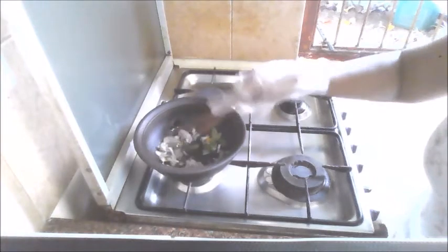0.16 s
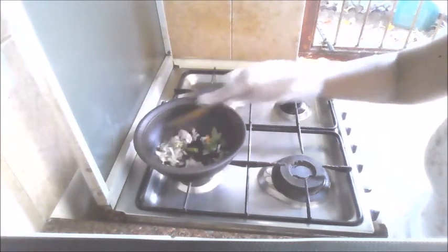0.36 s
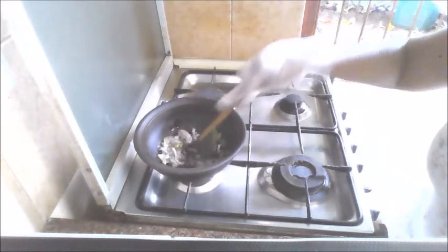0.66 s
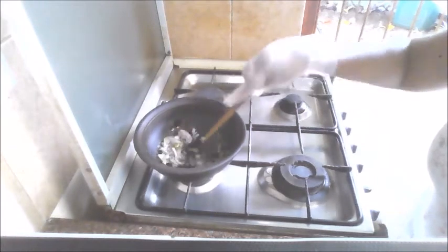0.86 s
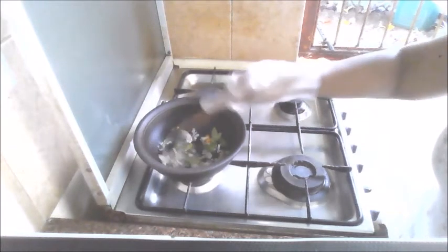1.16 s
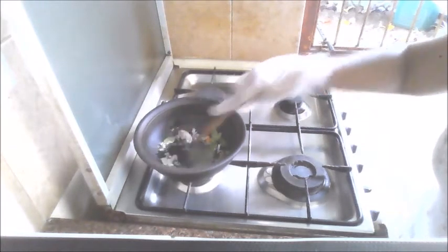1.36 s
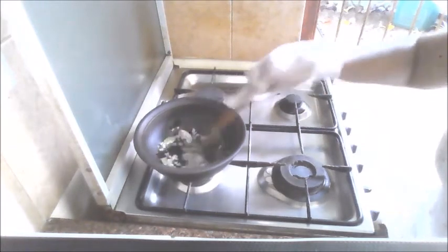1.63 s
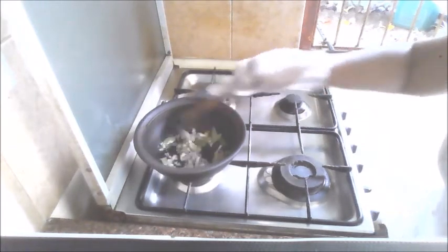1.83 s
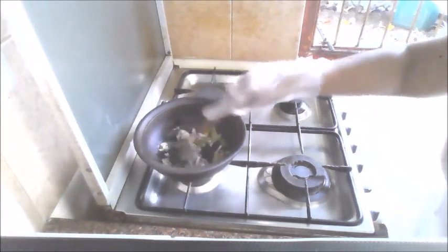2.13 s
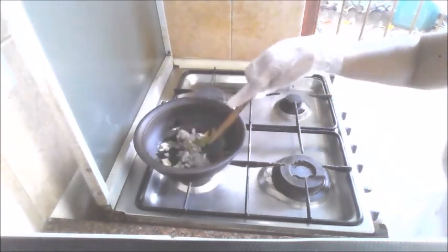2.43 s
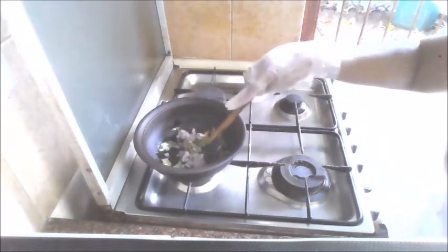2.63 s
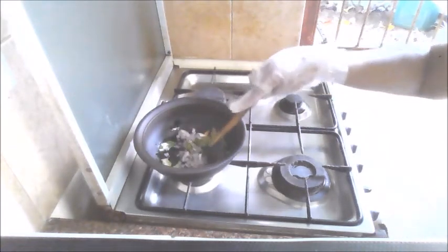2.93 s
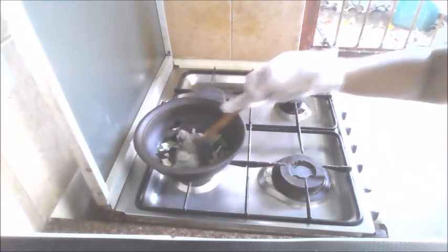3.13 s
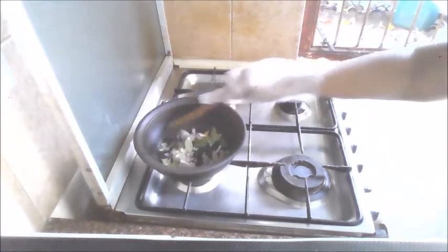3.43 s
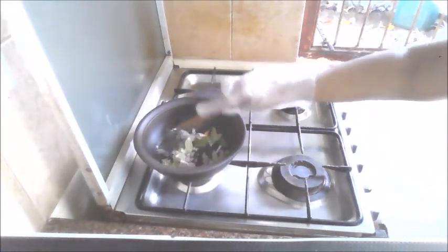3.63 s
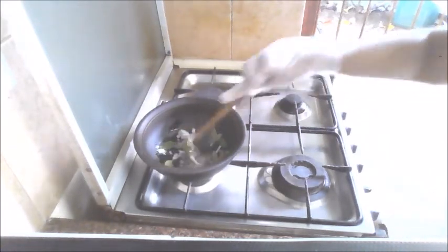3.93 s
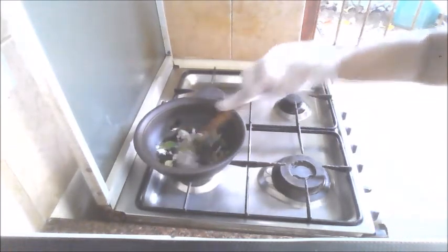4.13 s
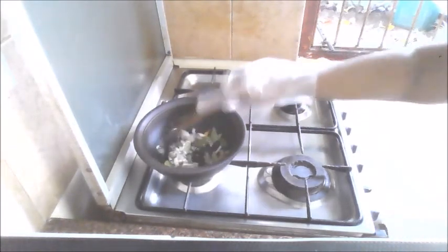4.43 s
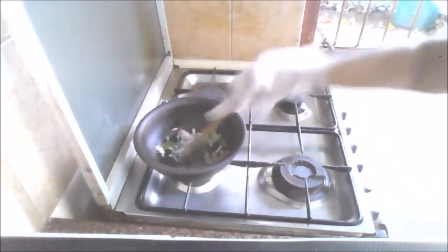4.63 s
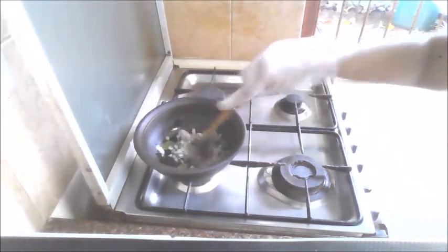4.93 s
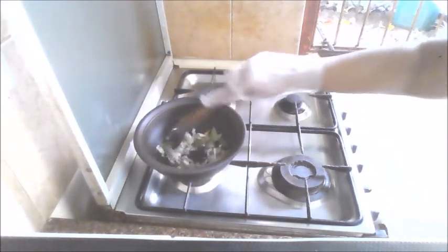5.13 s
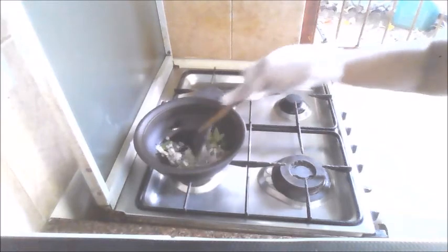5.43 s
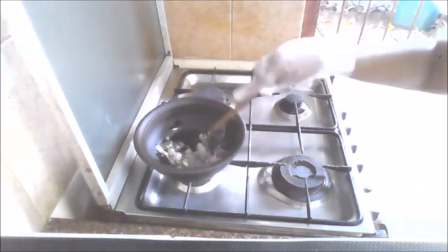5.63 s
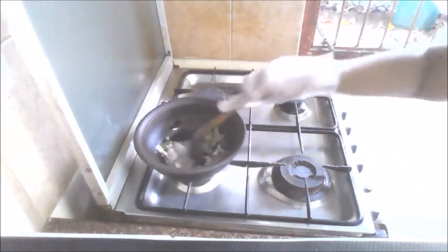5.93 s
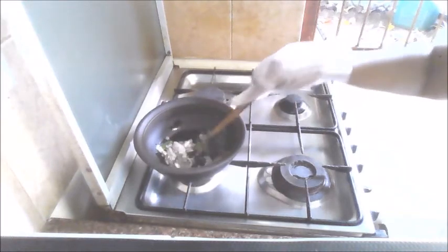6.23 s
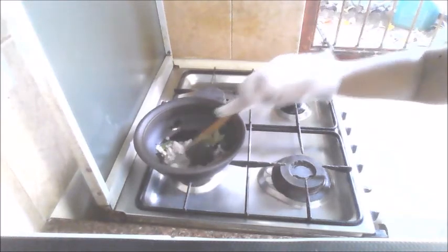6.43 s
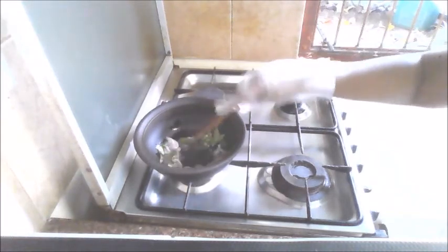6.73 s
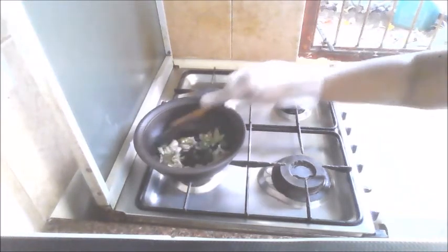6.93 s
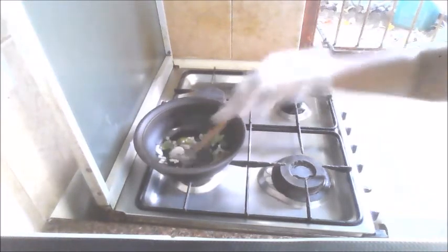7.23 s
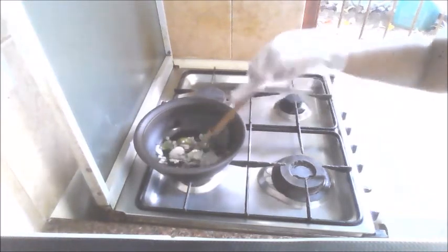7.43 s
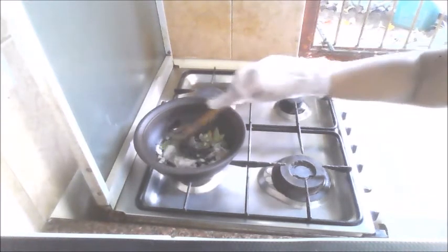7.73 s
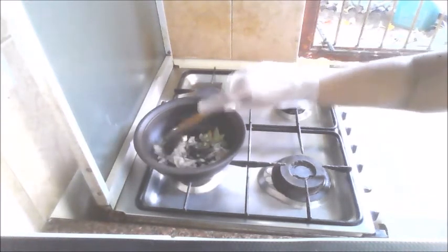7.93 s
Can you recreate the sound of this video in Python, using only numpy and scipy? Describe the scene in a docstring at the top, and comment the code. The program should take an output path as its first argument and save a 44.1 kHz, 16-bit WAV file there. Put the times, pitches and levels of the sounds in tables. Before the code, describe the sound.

A close microphone in a small tiled kitchen catches a wooden spoon stirring chopped vegetables in a clay pot on a stove. Oil fizzes quietly throughout, with fine high crackles and a sharp early spit at 0.1 s. Around 0.7-0.9 s the spoon scrapes and taps while the pot thumps low on its grate. Gentle gliding and rustling follow, with knocks at 2.2 and 2.6 s. A harder clack comes at 3.3 s, a strong double knock with a rasp at 4.3 s, more scraping and bright spits at 4.7-4.9 s, and the loudest knock at 5.4 s, trailed by a short scrape. Stirring then lightens, with small scrapes near 6.9 and 7.3 s and sizzling to the end at about 8 s. Outside, a faint, hoarse bird whistle rises and falls every 0.4 s until about 5.7 s. Still air and faint low hum lie behind.

```python
"""Stirring a clay pot

Close by, a wooden spoon stirs chopped vegetables in a clay pot on a gas stove in a small tiled room.
It knocks, chatters and scrapes: irregular impacts and slips ring the modes of the clay and the spoon.
Shaped noise makes the pot's rumble on its grate, the rustling food and the oil, which fizzes and spits.
Outside the window a bird repeats one arching, wavering whistle; a faint hum and still air lie behind."""
import sys
import numpy as np
from scipy import signal
from scipy.fft import rfft, irfft, next_fast_len
from scipy.io import wavfile
from scipy.ndimage import uniform_filter1d, map_coordinates

SR = 44100
rng = np.random.default_rng(int(sys.argv[2]) if len(sys.argv) > 2 else 0)


def generate_wav(sig):
    """Save sig (samples, or channels by samples) to the path in sys.argv[1] as 16-bit PCM at SR."""
    pcm = np.round(np.clip(np.atleast_2d(sig).T, -1, 1) * 32767).astype(np.int16)
    wavfile.write(sys.argv[1], SR, pcm)


N = 355887

# Spoon on the pot: (time [s], level before trim [dB], thud re middle band [dB], clack re middle band [dB],
# time between rebounds [s], loss per rebound [dB], resonance of that spot [Hz], its lift [dB], dull above [Hz])
KNOCKS = [(.359, -50, -17, 7, 0.0035, 3, 1930, 14.5, 3000), (0.718, -35, -19, 0, 0.019, 31, 1110, 10, 2600),
          (.744, -26, 1, -5, 0.011, 12, 540, 11, 3500), (.826, -29.5, -20, -5, 0.013, 9, 580, -5, 1500),
          (2.168, -28, -12, -4.5, .006, 10, 1060, -11, 3280),
          (2.175, -21.5, 2, -25, .016, 43, 790, 0, 2600),
          (2.583, -30, -10, 5.5, 0.016, 7.5, 1880, 7.5, 1890),
          (3.313, -17.5, -9.5, 1, 0.0084, 37.5, 1340, 6.5, 6340),
          (4.3296, -15, -4.5, -2.5, 0.0065, 9.5, 2270, 4, 3600),
          (4.344, -22.5, -5, -4.5, 0.0099, 19, 1300, 10, 3000),
          (4.662, -35, 11, -6.5, 0.011, 16.5, 790, 19.5, 4000),
          (4.855, -36.5, -14.5, -19, 0.0064, 3, 730, 17, 2500),
          (4.8635, -23, -6, -5.5, .011, 10, 1450, 4, 4030), (5.425, -12, -9, -3, 0.007, 8, 890, 5, 5000),
          (5.665, -53.5, 7, 6.5, 0.01, 28, 1590, 13.5, 2600),
          (6.01, -43.5, 6.5, -8, .016, 7, 213, 13, 4000), (6.076, -64, 23, 13, 0.012, 18, 2270, 7.5, 5000),
          (6.891, -26.5, -20, -4.5, 0.015, 2, 1840, 12.5, 7550)]
CHATTER_S, SPOT_WIDTH = .003, .14  # time scale of one contact's chatter; relative width of a spot's resonance


def knocks(count=3):
    """The spoon hits the wall and rebounds, each time weaker; the spot colours it, a soft touch is dull."""
    out = np.zeros(N)
    for s, db, thud_db, clack_db, gap, loss_db, spot_hz, lift_db, dull_hz in KNOCKS:
        softness = signal.butter(3, dull_hz, fs=SR, output="sos")

        def spot(hz):
            return 1 + (amp(lift_db) - 1) * resonance(hz, spot_hz, SPOT_WIDTH * spot_hz)

        for k in range(count):
            blow = filtered(contact(CHATTER_S, thud_db, clack_db), spot)
            blow = signal.sosfilt(softness, blow)
            add(out, s + k * gap, amp(db - 13.5 - k * loss_db) * blow)
    return out


# Dead sound of wood on clay: (frequency [Hz], relative level [dB])
CONTACT = [(60, -12.5), (130, -6.5), (450, -4), (750, 7), (1030, 6.5), (1400, 1.5), (1850, -6.5),
           (2300, 8.5), (3200, -9), (5000, -14), (9000, -18.5), (16000, -48)]


def contact(chatter, thud_db, clack_db):
    """One touch is a quick run of tiny impacts that rings the pot and the dead wood of the spoon."""
    t = np.arange(int(SR * .3)) / SR
    impacts = rng.random(len(t)) < 600 / SR
    force = impacts * rng.normal(0, .6, len(t)) * np.exp(-(t / chatter) ** 2)
    force[0] = 1
    energy = force ** 2 / np.sum(force ** 2)
    # every impact adds to the ring: the wood loses it at once, the clay holds it
    wood_power = signal.fftconvolve(energy, amp(-60 * t / 0.04) ** 2)[:len(t)]
    wood = 2.6 * np.sqrt(np.abs(wood_power)) * coloured(rng.standard_normal(len(t)), CONTACT)
    clay = pot_ring(t, driven=chatter, scatter_db=4) * np.sqrt(np.cumsum(energy))
    blow = (clay + wood) * (1 - np.exp(-t / 0.0014))
    blow = blow + amp(-2.5) * echo(blow, ROOM)
    # the flat of the spoon thuds, its edge clacks
    mixed = np.zeros(len(t))
    for edges_hz, db in (([90, 400], thud_db), ([400, 1500], 0), ([1500, 15000], clack_db)):
        part = signal.sosfilt(signal.butter(3, edges_hz, "band", fs=SR, output="sos"), blow)
        loudest = np.sqrt(uniform_filter1d(part ** 2, size=441).max())
        mixed += amp(db) * part / loudest
    return mixed


# Modes of the clay pot on its grate: (frequency [Hz], relative level [dB], 60 dB decay time [s])
POT = [(172, -4, .12), (197, -2.5, .2), (278, 1.5, .13), (345, -3, .04), (463, 1, .07), (565, -6, .088),
       (715, 5.5, .06), (810, 6.5, .06), (905, 1, .04), (1048, .5, .05), (1252, 2.5, .07), (1340, -2, .04),
       (1445, 1.5, .06), (1505, -1, .09), (1700, -3, .05), (1840, -9, .03), (1980, -8, .08),
       (2130, -5, .06), (2224, -1.5, .07), (2400, -5, .07), (2640, -5, .04), (2850, -11, .07),
       (3085, -10, .06), (3460, -12, .06), (3770, -14, .06)]


def pot_ring(t, driven, scatter_db):
    """The pot's modes die away once the drive ends; their strengths scatter from touch to touch."""
    hz, db, t60 = np.transpose(POT)[:, :, None]
    fall_db = 60 * np.maximum(t - driven, 0) / t60
    strength = amp(db + scatter_db * rng.standard_normal(hz.shape) - fall_db)
    return np.sum(strength * np.sin(2 * np.pi * (hz * t + rng.random(hz.shape))), axis=0)


# Firm strokes of the spoon: (time of full strength [s], length [s], scrape on the wall [dB],
# rasp of the spoon's edge [dB], centre of the rasp [Hz], rustle of the food before trim [dB])
STROKES = [(0.741, 0.083, -43, -58.5, 2300, -51.5), (0.838, 0.038, -56, -69, 1900, -93),
           (3.308, 0.078, -59, -53, 2640, -59), (4.335, 0.061, -50, -52, 2880, -51.5),
           (4.701, 0.033, -45.5, -57.5, 2680, -65), (4.865, 0.029, -48.5, -43, 1490, -48),
           (5.494, 0.054, -45.5, -53, 1920, -46), (5.562, 0.02, -77, -52, 3240, -46),
           (6.962, 0.084, -65, -63.5, 2210, -78), (6.898, 0.023, -51.5, -55.5, 3300, -51),
           (7.258, 0.096, -80, -68, 3690, -57)]
# Slips on rough clay: (frequency [Hz], relative level [dB per Hz])
SCRAPE = [(40, -59.5), (120, 5.5), (300, 8), (650, 12), (900, 3), (1500, 4), (1900, 16.5), (2500, -16),
          (3600, -19), (6000, -41), (12000, -37)]
STROKE_ATTACK_S, SCRAPE_RELEASE_S = 0.022, 0.22  # rise time; time to fall 60 dB
PRESSED_T60_S = .15  # extra decay of the pot under pressure, time to fall 60 dB
EDGE_HZ = 1100  # the scrape is dull above this


def scraping():
    """The spoon slips from grain to grain of the clay and rings the pot, which its pressure damps."""
    start, length, scrape_db, *_ = np.transpose(STROKES)
    t = np.arange(SR // 4) / SR
    slips = coloured(grains(rate=380, spread_db=3.5, life=0.00023), SCRAPE)
    damped_pot = amp(-60 * t / PRESSED_T60_S) * pot_ring(t, driven=0, scatter_db=0)
    rub = .45 * slips + 1.2 * unit(signal.fftconvolve(slips, damped_pot)[:N])
    body = filtered(rub, lambda hz: 1 / (1 + (hz / EDGE_HZ) ** 6))
    return drifting(body) * swells(zip(start, length, scrape_db), STROKE_ATTACK_S, SCRAPE_RELEASE_S)


RASP_DRIFT = .018  # size of the random stretch in time, relative


def drifting(x):
    """Resonances shift a little as the point of contact travels."""
    moved = np.arange(N) + np.cumsum(RASP_DRIFT * wobble(22))
    return map_coordinates(x, [moved], order=3)


# Modes of the wooden spoon, sounded by its dragging edge: (frequency [Hz], relative level [dB])
SPOON = [(1260, 12.5), (1440, 12.5), (1700, 2), (2000, 0), (2330, 4.5), (2620, 7.5), (2880, -4), (3380, 6),
         (3650, 7.5)]
SPOON_WIDTH_HZ, RASP_OCTAVES, RASP_FLICKER_DB = 46, .8, 4.5  # mode width; reach; unevenness
RASP_RELEASE_S = 0.051  # time to fall 60 dB
GRIT_DB = 1  # dry slips of the spoon's edge, before scaling by bandwidth


def rasping():
    """The dragging edge catches unevenly: it grates and sounds the wood; its angle picks the modes."""
    out, size = np.zeros(N), SR // 2
    t = np.arange(size) / SR
    slips = grains(rate=600, spread_db=3, life=.0007)
    mode_hz, mode_db = np.transpose(SPOON)
    for s, length, _, db, centre_hz, _ in STROKES:
        start = s - STROKE_ATTACK_S
        stroke = swells([(STROKE_ATTACK_S, length, db)], STROKE_ATTACK_S, RASP_RELEASE_S, size=size)
        force = slips[int(start * SR):][:size] * stroke
        grit = filtered(force, lambda hz: resonance(hz, centre_hz, centre_hz) ** 2)
        add(out, start, amp(GRIT_DB) * grit * np.sqrt(SR / (np.pi * centre_hz)))
        # modes near the centre of the rasp speak most
        weights = amp(mode_db) / (1 + (np.log2(mode_hz / centre_hz) / RASP_OCTAVES) ** 2)
        for f, weight in zip(mode_hz, weights / np.linalg.norm(weights)):
            uneven = force * amp(RASP_FLICKER_DB * wobble(30, size=size))
            ring = filtered(uneven, lambda hz: resonance(hz, f, SPOON_WIDTH_HZ))
            bent = np.interp(t + np.cumsum(RASP_DRIFT * wobble(22, size=size)) / SR, t, ring)
            add(out, start, 0.55 * weight * bent * np.sqrt(SR / (np.pi * SPOON_WIDTH_HZ)))
    return out


# Gentle stirring between the strokes: (time [s], pressure of the spoon [dB])
PRESSURE = [(0.0, -60.5), (0.61, -82.5), (0.92, -63), (1.28, -70), (2.25, -76), (2.4, -69), (3.86, -64.5),
            (4.23, -70.5), (4.83, -63), (5.96, -71), (6.92, -72.5), (7.08, -59), (7.62, -70.5), (8.07, -79)]
# Pot dragged on its grate: (frequency [Hz], relative level [dB per Hz])
RUMBLE = [(25, -25.5), (50, -19.5), (65, -10.5), (80, 0.5), (100, 5.5), (120, 4), (155, -4), (195, -5),
          (290, -12), (400, -20.5), (540, -12), (850, -28.5), (2000, -53)]
# A light touch that leaves the pot silent: (frequency [Hz], relative level [dB per Hz])
GLIDE = [(100, -38.5), (300, 12), (700, -9.5), (1050, -4), (1600, -3), (2400, -0.5), (4000, -37.5),
         (10000, -63)]
# Wet food turning: (frequency [Hz], relative level [dB per Hz])
RUSTLE = [(1000, -43.5), (2500, 13), (3500, 10.5), (6500, 13.5), (8500, 5), (13000, 16), (16000, 13.5)]
FOLLOWS = 0.34  # dB of rustle and rumble per dB of pressure
DRAG_DB, GLIDE_DB = 13, -4.5  # rumble re the motion; glide re the pressure
TURN_DB = 4  # rustle re the motion, before trim
RUSTLE_RELEASE_S = 0.06  # time to fall 60 dB


def stirring():
    """The spoon glides over the clay, drags the pot on its grate and turns the wet food."""
    start, length, *_, rustle_db = np.transpose(STROKES)
    pressure_db, = curves(PRESSURE)
    motion_db = pressure_db.mean() + FOLLOWS * (pressure_db - pressure_db.mean())
    judder_db, catch_db = 3.9 * wobble(12), 2.6 * wobble(18)
    dragging = coloured(grains(rate=200, spread_db=-0.5, life=0.006), RUMBLE)
    rumble = amp(motion_db + DRAG_DB + judder_db) * dragging
    gliding = coloured(grains(rate=400, spread_db=6.0, life=0.01), GLIDE)
    glide = amp(pressure_db + GLIDE_DB + catch_db) * gliding
    strokes = swells(zip(start, length, rustle_db), STROKE_ATTACK_S, RUSTLE_RELEASE_S)
    turning = amp(motion_db + TURN_DB) + strokes
    food = coloured(grains(rate=220, spread_db=1.8, life=0.008), RUSTLE)
    rustle = turning * amp(-1.5) * food
    return rumble + glide + rustle


# The pot tipping on its grate: (time of the swell's peak [s], level before trim [dB])
THUMPS = [(0.132, -33), (0.452, -36.5), (0.709, -29), (0.775, -25), (.903, -27), (0.986, -28), (1.104, -39),
          (2.29, -29.5), (3.218, -35.5), (3.386, -33), (3.932, -30.5), (4.407, -34), (4.553, -30.5),
          (4.76, -32), (5.275, -33.5), (5.48, -33.5), (6.123, -32), (6.465, -37), (6.611, -33),
          (7.433, -35.5)]
STOVE_HZ, STOVE_SCATTER = 101, .17  # nominal pitch of the stove top's boom; its relative spread


def rocking():
    """A hard push of the spoon tips the pot, and the stove top booms briefly under it."""
    out, t = np.zeros(N), np.arange(-SR // 10, SR // 10) / SR
    swell = np.exp(-(t / np.where(t < 0, .018, .03)) ** 2)
    for s, db in THUMPS:
        hz = STOVE_HZ * (1 + STOVE_SCATTER * rng.uniform(-1.1, 1))
        boom = np.sin(2 * np.pi * (hz * t + rng.random()))
        add(out, s + t[0], amp(db - 7.5) * swell * boom)
    return out


# Wet food meets hot clay and the sizzle flares: (time of full flare [s], length [s], level [dB])
FLARES = [(.11, 0.25, -55.5), (.7, 1.3, -64), (3.02, 0.53, -62), (4.44, 0.23, -54), (4.7, 2.2, -62),
          (6.72, 0.24, -57.5), (7.48, 0.57, -56)]
# Fizz of the oil: (frequency [Hz], relative level [dB per Hz])
SIZZLE = [(2000, -30.5), (5000, -8.5), (7500, -23), (9500, -3), (12000, 1), (15500, 0.5), (17000, -0.5)]
# The loudest spits of oil: (time [s], level before trim [dB], centre [Hz])
SPITS = [(0.0842, -37, 12800), (0.1191, -27, 12000), (0.4813, -41, 15100), (0.6938, -36, 15100),
         (1.0515, -34, 11500), (1.291, -39, 13900), (1.3658, -44, 15000), (1.5115, -42, 12400),
         (1.6506, -43, 15500), (1.727, -44, 13300), (1.8811, -42, 12700), (1.9435, -41, 4900),
         (2.0757, -40, 14800), (2.7846, -43, 13800), (3.02, -41, 11400), (3.0749, -36, 12900),
         (3.2006, -39, 13400), (3.4575, -41, 12300), (4.1969, -43, 14000), (4.5266, -35, 11200),
         (4.7591, -30, 12500), (4.8424, -28, 12500), (5.3393, -37, 13600), (5.4809, -34, 14000),
         (5.9718, -37, 6710), (6.34, -32, 11400), (6.6907, -36, 14600), (6.7082, -36, 12400),
         (6.8887, -38, 13100), (6.984, -37, 12700), (7.0539, -42, 5000), (7.416, -38, 5000),
         (7.9084, -37, 13900)]
SIZZLE_DB = -64.5  # steady frying, the reference for fizz and ticks
FLARE_ATTACK_S, FLARE_RELEASE_S = 0.12, 0.061  # rise time; time to fall 60 dB
TICKS_PER_S, TICK_RANGE_DB = 70, 15
TICK_DB, FIZZ_DB = -5, -3.5  # smallest ticks and the fizz, re the sizzle


def frying():
    """Tiny steam bubbles fizz, droplets crackle each at its own pitch, now and then a large one spits."""
    sizzle = np.hypot(amp(SIZZLE_DB), swells(FLARES, FLARE_ATTACK_S, FLARE_RELEASE_S))
    surge = amp(1.5 * wobble(11))
    bubbles = grains(rate=600, spread_db=4, life=0.003)
    out = sizzle * surge * amp(FIZZ_DB) * coloured(bubbles, SIZZLE)
    for place, pitch, size in rng.random((int(TICKS_PER_S * N / SR), 3)):
        tick = spit(8000 + 7000 * np.sqrt(pitch), width=.8, t60=.022)
        level = sizzle[int(place * N)] * amp(TICK_DB + TICK_RANGE_DB * size ** 4)
        add(out, place * N / SR, level * tick)
    for s, db, centre_hz in SPITS:
        add(out, s, amp(db - 9) * spit(centre_hz, width=0.5, t60=0.06))
    return out


def spit(centre_hz, width, t60):
    """One droplet bursting: a sharp, broad crack in a band of relative width."""
    t = np.arange(SR // 16) / SR
    noise = rng.standard_normal(len(t))
    burst = unit(filtered(noise, lambda hz: resonance(hz, centre_hz, width * centre_hz) ** 2))
    return burst * amp(-60 * t / t60)


# Small tiled room: (frequency [Hz], 60 dB decay time [s])
ROOM = [(100, 0.16), (500, 0.17), (2000, 0.13), (6000, 0.078), (14000, 0.14)]


def shifting_echo(x, count=3):
    """Reflections of the room that keep changing as the arm and the food move."""
    shares = np.array([wobble(7) for _ in range(count)])
    shares = shares / np.linalg.norm(shares, axis=0)
    return sum(share * echo(x, ROOM) for share in shares)


# The bird's nearly even calls: (time [s], level before trim [dB])
CHIRPS = [(0.23, -66), (0.643, -65.5), (1.038, -66), (1.448, -68), (1.863, -67.5), (2.261, -65),
          (2.665, -65.5), (3.081, -65.5), (3.478, -62), (3.899, -64.5), (4.323, -59.5), (4.751, -62.5),
          (5.16, -64.5), (5.569, -61.5)]
# One call: (time from its start [s], nominal pitch [Hz], relative level [dB])
ARCH = [(0, 3250, -14), (.028, 3400, 1), (.044, 3480, 4.5), (.058, 3700, 0), (.07, 4250, -.5),
        (.084, 4800, 2.5), (.098, 4780, 1), (.11, 4350, -1), (.126, 3800, -3), (.15, 3000, -13)]
# The yard outside the window: (frequency [Hz], 60 dB decay time [s])
YARD = [(2000, 0.57), (5000, 0.27)]


def bird():
    """A hoarse whistle climbs and falls, never quite alike, mostly by way of the walls of the yard."""
    out, size = np.zeros(N), int(ARCH[-1][0] * SR)
    pitch_hz, shape_db = curves(ARCH, size=size)
    for s, db in CHIRPS:
        waver = unit(uniform_filter1d(rng.standard_normal(size), size=SR // 1000))
        flutter = unit(uniform_filter1d(rng.standard_normal(size), size=SR // 200))
        hoarse_hz = pitch_hz * (1 + 0.05 * waver + rng.normal(0, 0.012))
        whistle = np.sin(2 * np.pi * np.cumsum(hoarse_hz) / SR)
        call = np.pad(amp(shape_db + 4.5 * flutter) * whistle, (0, SR // 3))  # room for the echo
        add(out, s - .008, amp(db + 5.5) * (.15 * call + echo(call, YARD)))
    return filtered(out, lambda hz: 1 / np.sqrt(1 + (hz / 5100) ** 60))


# Still air: (frequency [Hz], relative level [dB per Hz])
KITCHEN = [(25, -25), (60, -8.5), (110, 0.5), (300, -6.5), (400, -17.5), (580, -15.5), (950, -29.5),
           (2000, -34.5), (4500, -38.5), (8000, -57), (16000, -42)]
# Hum, each tone wavering about its level: (frequency [Hz], level [dB])
HUM = [(99, -70.5), (198, -73.5), (297, -78)]
AIR_DB, AIR_SWAY_DB = -63, 2  # level of the still air before its drift; size of each band's drift


def kitchen():
    """Still air that drifts a little, band by band, and a faint, slightly unsteady hum."""
    t = np.arange(N) / SR + 0.0019 * wobble(6.0)
    hum = sum(amp(db + 1.8 * wobble(31)) * np.sqrt(2) * np.sin(2 * np.pi * hz * t) for hz, db in HUM)
    air = coloured(rng.standard_normal(N), KITCHEN)
    edges_hz = [0, 180, 420, 800, 1700, 3500, SR]
    drifting_air = np.zeros(N)
    for lo, hi in zip(edges_hz, edges_hz[1:]):
        band = filtered(air, lambda hz: (hz >= lo) & (hz < hi))
        drifting_air += band * amp(AIR_SWAY_DB * wobble(11))
    return hum + amp(AIR_DB) * drifting_air


def amp(db):
    """Decibels to gain."""
    return 10 ** (np.asarray(db) / 20)


def unit(x):
    """Scale to rms 1."""
    return x / np.sqrt(np.mean(x ** 2) + 1e-20)


def along(points, hz):
    """Read (frequency [Hz], value) points on a log axis."""
    f, v = np.transpose(points)
    return np.interp(np.log(hz + 1), np.log(f + 1), v)


def curves(rows, size=N):
    """One value per sample for each column after the time."""
    s, *cols = np.transpose(rows)
    return [np.interp(np.arange(size) / SR, s, c) for c in cols]


def wobble(rate, size=N):
    """A smooth random curve, rate knots a second."""
    knots = rng.standard_normal(int(size * rate / SR) + 4)
    return map_coordinates(knots, [np.arange(size) * rate / SR])


def swells(rows, attack, release, size=N):
    """Gain for (time of full level [s], length [s], level [dB]) rows: each rises, holds and dies away."""
    t = np.arange(size) / SR
    gain = np.zeros(size)
    for s, length, db in rows:
        fall_db = 60 * np.maximum(t - s - length, 0) / release
        gain += amp(db - fall_db) * np.clip(1 + (t - s) / attack, 0, 1) ** 2
    return gain


def filtered(x, response):
    """x through a frequency response."""
    m = next_fast_len(len(x) + SR // 4)
    return irfft(rfft(x, m) * response(np.fft.rfftfreq(m, 1 / SR)), m)[:len(x)]


def coloured(x, spectrum):
    """x shaped by a (frequency [Hz], level [dB]) spectrum, at rms 1."""
    return unit(filtered(x, lambda hz: amp(along(spectrum, hz))))


def resonance(hz, centre, width):
    """Response of one damped mode, 1 at its centre."""
    return 1j * hz * width / (centre ** 2 - hz ** 2 + 1j * hz * width)


def grains(rate, spread_db, life):
    """Noise made of brief bursts of unequal size, rate a second."""
    sizes = (rng.random(N) < rate / SR) * amp(spread_db * np.minimum(rng.exponential(size=N), 4))
    power = signal.lfilter([1], [1, -np.exp(-2 / (life * SR))], sizes ** 2)
    return unit(np.sqrt(power) * rng.standard_normal(N))


def echo(x, decay):
    """Diffuse reflections; each frequency dies at its own speed."""
    hz, t, z = signal.stft(rng.standard_normal(SR // 2), SR, nperseg=256)
    dying = z * amp(-60 * t / along(decay, hz)[:, None])
    tail = signal.istft(dying, SR, nperseg=256)[1]
    return signal.fftconvolve(x, tail / np.linalg.norm(tail))[:len(x)]


def add(track, s, sound):
    """Mix a sound into the track at time s."""
    start = max(round(s * SR), 0)
    track[start:start + len(sound)] += sound[:N - start]


def scene():
    """The stove in a small tiled room, the bird beyond the window."""
    cooking = stirring() + scraping() + rasping() + frying()
    tiles = amp(-2.0) * shifting_echo(cooking)
    return (knocks() + rocking() + cooking + tiles + bird() + kitchen())[None]


TOP_HZ = 15850  # band limit of the microphone


def record(dry):
    """The microphone keeps nothing above its band limit."""
    return filtered(dry[0], lambda hz: hz < TOP_HZ)[None]


dry = scene()
out = record(dry)
generate_wav(out)
```